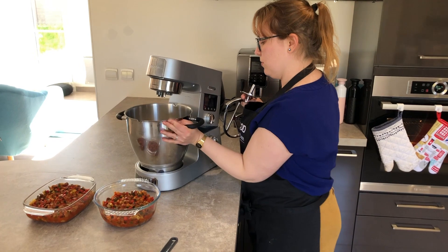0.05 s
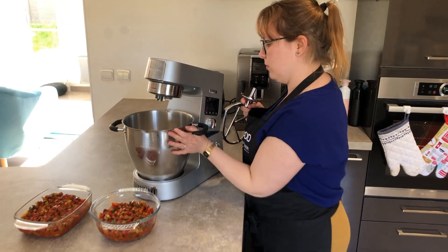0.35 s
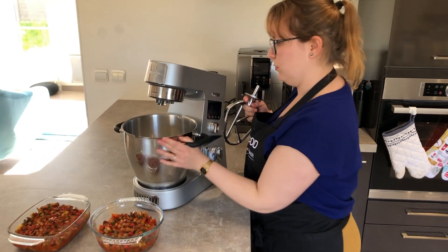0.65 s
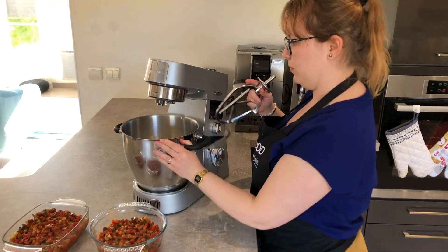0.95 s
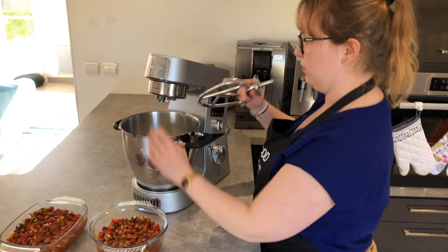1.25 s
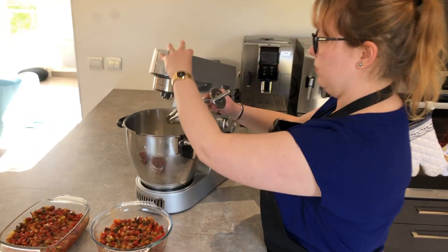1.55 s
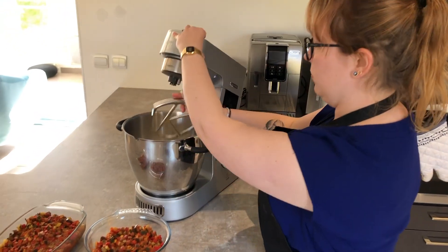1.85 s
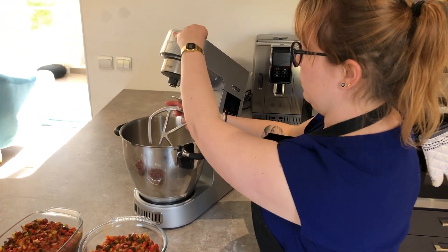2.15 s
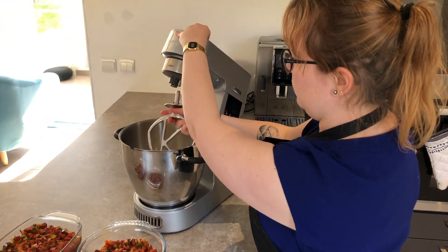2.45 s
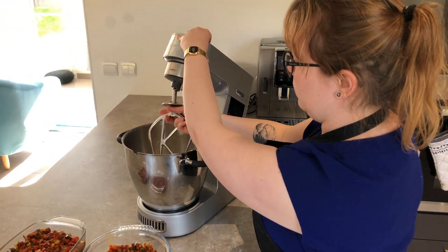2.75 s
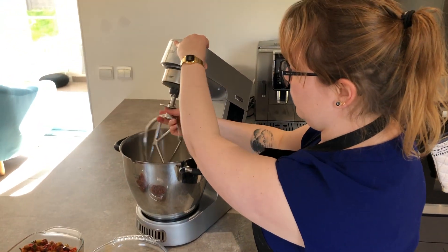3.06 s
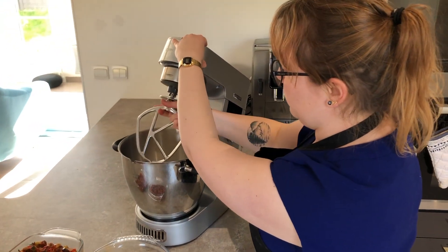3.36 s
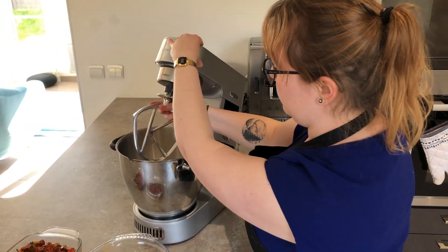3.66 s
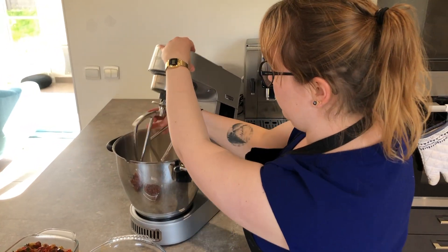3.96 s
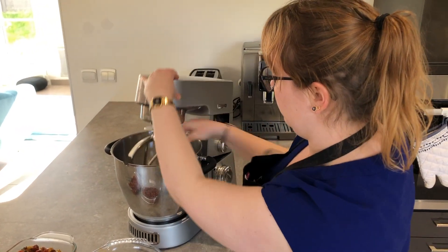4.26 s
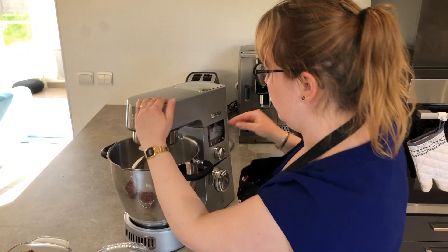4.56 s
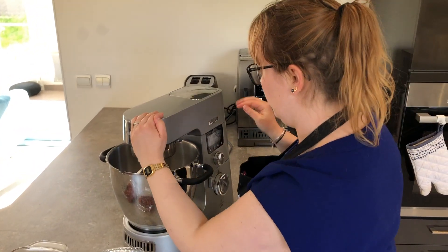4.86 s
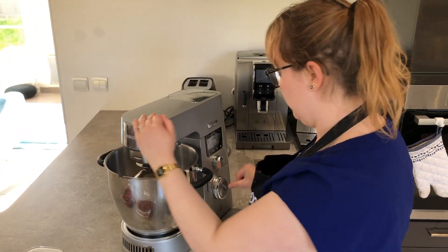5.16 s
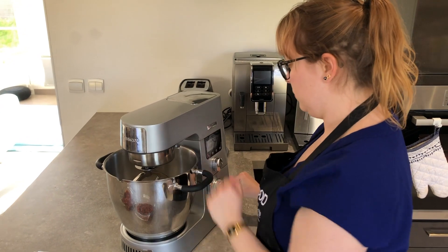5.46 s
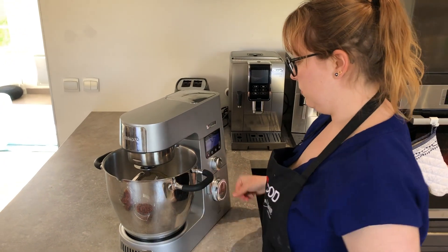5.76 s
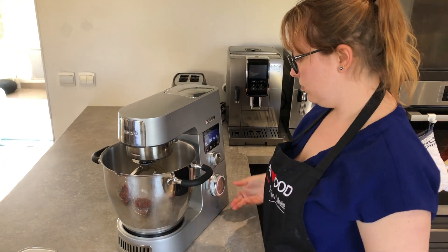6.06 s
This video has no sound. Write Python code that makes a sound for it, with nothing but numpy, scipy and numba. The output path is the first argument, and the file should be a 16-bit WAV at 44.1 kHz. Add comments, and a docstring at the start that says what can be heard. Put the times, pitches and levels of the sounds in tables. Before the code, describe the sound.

A steel bowl clunks, scrapes and squeaks into the base of a stand mixer, which thumps on the worktop. The head tilts up with a faint hollow rub, and a metal beater clicks and grazes into its socket, ringing brightly. The head swings down and locks with a sharp knock, followed by soft dial ticks. The motor stays off, and everything sounds nearby in a hard, echoing kitchen.

```python
"""A steel bowl clunks, scrapes and squeaks as it is twisted into the base of a stand mixer. The head
tilts up with a hollow rub, a beater clicks into its socket, and the head swings down and locks with
a sharp knock. The speed dial ticks softly, but the motor stays off. Each blow is a short clatter plus
ringing metal; the machine thumps on the worktop and a hard kitchen echoes it all."""
import sys
import numpy as np
from scipy import signal
from scipy.fft import rfft, irfft
from scipy.io import wavfile
from numba import njit

SR = 44100
rng = np.random.default_rng(int(sys.argv[2]) if len(sys.argv) > 2 else 0)


def output_pcm(signal):
    """Save a mono or channel-first signal as 16-bit PCM at the path in sys.argv[1].

    Samples are clipped to [-1, 1] before scaling.
    """
    pcm = np.clip(np.atleast_2d(signal).T, -1, 1) * 32767
    wavfile.write(sys.argv[1], SR, np.round(pcm).astype(np.int16))


N = 278271

# a blow or rub has four levels, one for each region from body to sizzle (frequency [Hz])
REGION_HZ = [350, 1400, 4500, 11000]
BANDS_HZ = 100 * 2 ** (np.arange(23) / 3)  # third octaves

# bowl lugs hitting the base (time [s], contact, place, level [dB], hardness [dB/octave])
BOWL_BLOWS = [(.023, "clunk", "foot", -36, 3.35), (.038, "clunk", "rim", -36, 1.1),
              (.073, "clunk", "rim", -43, 0.5), (.157, "clunk", "foot", -49.5, -0.5),
              (.318, "clunk", "rim", -48.5, -0.5), (.3585, "click", "foot", -32, 1.2),
              (.370, "clunk", "foot", -36, 0.4), (.381, "clunk", "rim", -41.5, 2.2),
              (.4605, "clack", "foot", -43.5, 0.54), (.6405, "clunk", "foot", -49, 0.2),
              (.670, "clunk", "foot", -49, -1.5), (.6855, "clunk", "rim", -44, -1.5),
              (.710, "clunk", "foot", -47, -0.5)]
# tone colour of their clatter (frequency [Hz], level [dB])
BOWL_COLOUR = [(100, -8.5), (160, -3), (250, -1.5), (400, -1.5), (630, -4.5), (900, -1.5), (1600, -2),
               (2500, -8.5), (3500, -2.5), (5000, -4.5), (7000, -2), (10000, -3.5), (15000, -9)]
# ring of the bowl and of the base under it (frequency [Hz], level [dB], t60 [s])
BOWL_MODES = [(280, -2.5, 0.11), (351, -10, 0.1), (380, 0, 0.77), (394, 3.5, 0.32), (434, -4.5, 0.58),
              (515, 2, 0.34), (563, -2, 0.65), (760, -11, 0.3), (2083, -25.5, 1), (3420, -16, 0.32),
              (3570, -28, 0.208), (3950, -53, 0.28), (5690, -34, .35)]
BASE_MODES = [(116, 2, 0.45), (164, 1.5, 0.4), (212.3, 1, 0.67), (254, 4, 0.36)]


def bowl():
    """The bowl's lugs knock against the base and set both ringing."""
    return strike(BOWL_BLOWS, BOWL_COLOUR)


# beater hitting the socket (time [s], contact, place, level [dB], hardness [dB/octave])
BEATER_BLOWS = [(2.642, "tick", "shank", -62, 4.5), (2.6705, "click", "beater", -32.5, -0.3),
                (2.761, "graze", "shank", -40.5, -0.4), (2.867, "graze", "socket", -43, -1.2),
                (2.876, "clunk", "socket", -46.5, 4), (2.923, "knock", "shank", -49.5, -3),
                (3.170, "tick", "shank", -51, -0.8), (3.190, "tick", "shank", -52.5, 0),
                (3.238, "knock", "shank", -60, 4), (3.2965, "clack", "head", -40, 0.7),
                (3.541, "tap", "shank", -59, 2), (3.567, "knock", "shank", -50.5, 0.7),
                (3.9315, "click", "shank", -37.5, 0.34)]
# tone colour of their clatter (frequency [Hz], level [dB])
BEATER_COLOUR = [(100, -6.5), (160, -10), (250, 1.5), (400, -1.5), (630, -10), (1000, -4), (1550, -6.5),
                 (2500, -10.5), (3400, -11), (4500, -12.5), (7000, -19), (10000, -17), (15000, -26)]
# bright ring of beater and socket, lower ring of the head (frequency [Hz], level [dB], t60 [s])
BEATER_MODES = [(1500, -8, .05), (1825, -12, .25), (2110, -11, .1), (2370, -15, .1), (2885, -8, .3),
                (3330, -5, .08), (3480, -4, .08), (4369, -6, .27), (4721, -17, .34), (4888, -3, .34),
                (4998, -14, .5), (5270, 0, .33), (5550, -12, .3), (5927, -18, .27), (6471, -27, .4),
                (8403, -29, .45), (9674, -31, .35), (10510, -27, .35), (10850, -16, .22)]
SOCKET_MODES = [(805, -10, .2), (990, -10, .2), (2084, -13, .2), (3357, -7, .25), (3540, -8, .2),
                (4341, -7, .25), (4921, -8, .15), (5141, -9, .2), (5206, -6, .2), (5357, -4, .24),
                (5549, -14, .25), (5640, -13, .2), (5931, -4, .26), (6030, -11, .2), (6191, -12, .35),
                (6912, -19, .34), (8409, -22, .4), (9426, -23, .3), (10290, -25, .45), (10850, -23, .2),
                (11160, -22, .17)]
HEAD_MODES = [(343, 0, .28), (463, 0, .38), (947, -12, .3), (1024, -9, .3), (1250, -12, .45),
              (1470, -6, .2), (1508, -2, .33), (1540, 15, .035), (1580, -5, .22), (1895, -16, .4),
              (2455, -20, .3), (3147, -16, .35), (3490, -13, .35), (3801, -15, .35), (4330, -16, .2),
              (4883, -25, .5), (5534, -26, .5), (6476, -22, .35), (6912, -23, .5), (9450, -28, .3),
              (10870, -23, .35)]


def beater():
    """The beater ticks and grazes its way into the socket; the hand damps blows on its shank."""
    return strike(BEATER_BLOWS, BEATER_COLOUR)


# hinge, lock and dial knocks (time [s], contact, place, level [dB], hardness [dB/octave])
FRAME_BLOWS = [(2.130, "tap", "damped frame", -65.5, -0.5), (2.199, "click", "damped frame", -61.5, 0.2),
               (4.126, "clunk", "damped frame", -57, 1), (4.726, "knock", "damped frame", -53, -1),
               (4.763, "click", "damped frame", -43, -5.5), (4.7697, "clack", "frame", -30.5, -0.6),
               (4.775, "clack", "frame", -40, -0.5), (4.7865, "clack", "damped frame", -31.5, -0.5),
               (4.797, "clunk", "frame", -33, -0.6), (5.238, "knock", "damped frame", -60, -4.5),
               (5.618, "knock", "damped frame", -66, -3.5)]
# tone colour of their clatter (frequency [Hz], level [dB])
FRAME_COLOUR = [(100, -46), (160, -13.5), (210, -7.5), (280, 2), (400, -4), (630, -8), (1000, -4),
                (1500, -5), (2000, -8.5), (3200, -3), (5000, -5.5), (7500, -0.5), (10000, -3), (15000, -10)]
# ring of the mixer's frame (frequency [Hz], level [dB], t60 [s])
FRAME_MODES = [(244, -2.5, 0.49), (260, -1, 0.07), (287, -21, 0.22), (319.6, 12, 0.094), (373.4, -3, 0.38),
               (399.7, 0, 0.5), (445, -2.5, 0.38), (586, -9, 0.38), (611, -5.5, 0.8), (669, -5.5, 0.58),
               (702, 0, 0.4), (762, -7, 0.21), (990, -4, 0.48), (1007, 2.5, 0.16), (1010, -11, 0.33),
               (1167, -8, 0.23), (1325, -10, 0.41), (1664, -17, 0.19), (2690, -40, .15)]


def frame():
    """Damped knocks barely ring the mixer's frame; the slam of the head locking rings it fully."""
    return strike(FRAME_BLOWS, FRAME_COLOUR)


# ways two parts meet, by contact (level in each region [dB], clatter t60 [s])
CONTACTS = {"clunk": ([1.5, -10, -3.5, -18], 0.098), "click": ([-15.5, -10, 0, -12.5], 0.029),
            "clack": ([-2.5, 0.5, -0.5, -9.5], 0.032), "tick": ([-2, -14, -2, 0], 0.037),
            "graze": ([-11, -4, 4, -24], 0.066), "tap": ([-20, 0.5, -11, -36], 0.016),
            "knock": ([-1, -2.5, -13, -44], 0.041)}
# what rings, by place struck (modes, level relative to the driving force [dB])
RINGS = {"rim": [(BOWL_MODES, -4.5), (BASE_MODES, -11.5)],
         "foot": [(BOWL_MODES, -15.5), (BASE_MODES, -6)],
         "beater": [(BEATER_MODES, 0), (HEAD_MODES, -16.5)],
         "socket": [(SOCKET_MODES, -2)],
         "head": [(HEAD_MODES, -3.5)],
         "shank": [(HEAD_MODES, -23)],
         "frame": [(FRAME_MODES, -4)],
         "damped frame": [(FRAME_MODES, -15)]}
# where in its spectrum a blow drives the ring, by place struck (frequency [Hz])
DRIVE_HZ = {"rim": 350, "foot": 350, "beater": 4500, "socket": 4500,
            "head": 1400, "shank": 1400, "frame": 1400, "damped frame": 1400}


def strike(blows, colour):
    """Blows on one assembly: returns their clatter and the ring of its parts, which follows the force."""
    knocks, rings = np.zeros(N), np.zeros(N)
    for s, kind, place, db, hardness in blows:
        shape_db, t60 = CONTACTS[kind]
        region_db = tilt(shape_db, db, hardness)
        add(knocks, s, clatter(band_gains(region_db, colour), t60))
        force_db = at(list(zip(REGION_HZ, region_db)), DRIVE_HZ[place])
        for modes, ring_db in RINGS[place]:
            add(rings, s, undb(force_db + ring_db) * ring(modes))
    return knocks, rings


def clatter(gains, t60, low_linger=0.22):
    """Crowded, heavily damped modes; t60 holds at 3 kHz and lower bands last longer."""
    t = clock(.25)
    bands = [burst(t, hz, t60 * (3000 / hz) ** low_linger) for hz in BANDS_HZ]
    return gains @ np.array(bands)


def ring(modes):
    """A part's clear modes start together; each blow shares its energy among them a little differently."""
    t = clock(.9)
    out = 0
    for hz, db, t60 in modes:
        out = out + undb(db + rng.standard_normal()) * fade(t, t60) * np.sin(2 * np.pi * hz * t)
    attack = 1 - fade(t, 0.0033)
    return out * attack


# shoves on the machine (time [s], pitch [Hz], level [dB], whether it rocks back)
THUMPS = [(0.044, 86.3, -29.5, True), (.386, 82.8, -26, True), (0.707, 91.2, -42, False),
          (2.95, 80.5, -55, False), (3.136, 99, -48, False), (3.332, 88.5, -50.5, False),
          (4.792, 67.7, -34, False), (5.259, 64.3, -53, False)]


def worktop(swell_s=0.024, tail_db=-12, sway_hz=53.3):
    """The heavy machine sways and rocks on its feet: low thumps that build over a few cycles and linger."""
    out, t = np.zeros(N), clock(.8)
    push = (t / swell_s * np.exp(1 - t / swell_s)) ** 2
    linger = undb(tail_db) * (1 - np.exp(-t / swell_s)) * fade(t, .65)
    thump = lambda hz, db: undb(db) * (push + linger) * np.sin(2 * np.pi * hz * t)
    for s, hz, db, rocks_back in THUMPS:
        add(out, s - .017, thump(sway_hz, db - 10))  # the whole machine sways first
        add(out, s, thump(hz, db))
        if rocks_back:
            add(out, s + .125, thump(hz, db - 12.5))
    return out


# squeaks of the bowl's rim (time [s], pitch [Hz], level [dB])
SQUEAKS = [(.1565, 4550, -41.5), (.380, 5060, -40), (.685, 3890, -43.5)]


def squeaks():
    """The rim binds and chatters briefly in one narrow resonance."""
    out = np.zeros(N)
    for s, hz, db in SQUEAKS:
        add(out, s, undb(db) * burst(clock(.2), hz, t60=0.027))
    return out


# swings of the head (peak time [s], rise [s], fall [s], pitch at peak [Hz], sink [octaves/s], level [dB])
SWINGS = [(1.88, .26, 0.16, 975, 0.95, -60), (4.14, .04, 0.19, 1040, 3.9, -58),
          (4.41, .18, .14, 564, 4.2, -54)]
# broad friction in each region (level relative to the hollow resonance [dB])
HINGE_FRICTION_DB = [-1.5, -13, -20, -28]


def hinge(swell_db=20, q=2.5):
    """Friction in the hinge follows the head's speed and sounds through one sinking cavity resonance."""
    out = np.zeros(N)
    for s, rise, fall, peak_hz, sink, db in SWINGS:
        t = clock(rise + fall) - rise
        speed = undb(db - swell_db * np.maximum(-t / rise, t / fall))
        hz = peak_hz * 2 ** (-sink * t)
        noise = rng.standard_normal(len(t))
        cavity = resonate(resonate(noise, hz, q), hz, q) / np.sqrt(hz)
        hollow = speed * unit(cavity) * np.sqrt(len(t))
        add(out, s - rise, hollow + friction(speed, HINGE_FRICTION_DB, grain_db=3.0))
    return out


# steel, hands and sleeves sliding (start [s], length [s], slide, level [dB], hardness [dB/octave])
RUBS = [(-.03, .052, "scrape", -47, 0.2), (0.323, .051, "scrape", -45.5, -1),
        (1.10, .11, "brush", -78.5, 1.7), (1.193, 0.037, "scrape", -70.5, 3),
        (1.571, 0.17, "brush", -74.5, 1.3), (2.183, 0.15, "brush", -74.5, 3.2),
        (2.986, 0.33, "brush", -65, -5), (4.107, 0.16, "brush", -71.5, 0.4),
        (4.219, 0.41, "brush", -77.5, -2.2), (4.565, 0.38, "scrape", -74, -0.8),
        (5.421, 0.41, "brush", -81.5, 1.5), (5.951, .11, "scrape", -81, 2.6)]
# scrape and brush (level in each region [dB])
SLIDES = {"scrape": [1, -8, -3, -9.5], "brush": [-2.5, 0.5, -6, -12]}


def rubbing():
    """Steel and hands slide: each rub swells and dies away."""
    out = np.zeros(N)
    for s, length, kind, db, hardness in RUBS:
        swell = signal.windows.tukey(len(clock(length)), .8)
        add(out, s, friction(swell, tilt(SLIDES[kind], db, hardness), grain_db=2.0))
    return out


# tone colour of sliding surfaces (frequency [Hz], level [dB])
RUB_COLOUR = [(100, -14), (160, -13.5), (300, -2), (550, -3.5), (1000, -1), (1600, -4.5), (3000, 0.5),
              (5000, 1.5), (8000, -3.5), (15000, -8)]


def friction(envelope, region_db, grain_db):
    """Dense tiny slips of uneven size under an envelope."""
    n = len(envelope)
    slips = undb(grain_db * rng.exponential(size=n))
    bands = [unit(band(slips * rng.standard_normal(n), hz)) for hz in BANDS_HZ]
    return band_gains(region_db, RUB_COLOUR) @ np.array(bands) * np.sqrt(n) * envelope


# ticks of the speed dial (time [s], level [dB])
DETENTS = [(5.446, -68), (5.467, -56.5), (5.616, -59), (5.640, -71)]


def dial():
    """The speed dial turns through soft detents, each a tiny rattle in the same resonance."""
    out = np.zeros(N)
    for s, db in DETENTS:
        add(out, s, undb(db) * burst(clock(.2), hz=950, t60=0.025))
    return out


# reverb decay of the kitchen (frequency [Hz], t60 [s])
KITCHEN_T60 = [(80, 0.48), (300, 0.57), (1000, 0.73), (3500, 0.67), (6000, 0.58), (9000, 0.33),
               (15000, 0.22)]


def kitchen(x, build_s=0.0029):
    """Echoes off worktop, walls and cupboards thicken quickly; the treble dies first."""
    t = clock(.9)
    build = 1 - np.exp(-t / build_s)
    response = 0
    for hz in BANDS_HZ:
        tail = rng.standard_normal(len(t)) * fade(t, at(KITCHEN_T60, hz)) * build
        response = response + unit(band(tail, hz)) * np.sqrt(hz)
    return signal.fftconvolve(x, unit(response))[:N]


# room tone spectrum (frequency [Hz], relative level [dB])
ROOM_TONE = [(26, -48), (45, -16), (103, -5), (155, -13.5), (229, -2.5), (265, -10), (300, -2.5),
             (364, -12.5), (391, -11), (578, -17), (637, -15.5), (685, -18.5), (1110, -23), (1320, -24.5),
             (15000, -45)]


def room_tone(level_db=-62):
    """The soft steady rush of the room."""
    colour = undb(at(ROOM_TONE, np.fft.rfftfreq(N, 1 / SR)))
    noise = irfft(rfft(rng.standard_normal(N)) * colour, N)
    return undb(level_db) * unit(noise) * np.sqrt(N)


def tilt(shape_db, db, hardness, pivot_hz=1400):
    """Level in each region: a harder contact tips the balance towards the treble."""
    return db + np.array(shape_db) + hardness * np.log2(np.array(REGION_HZ) / pivot_hz)


def band_gains(region_db, colour):
    """Gain of every band for one contact on one part."""
    return undb(np.interp(np.log(BANDS_HZ), np.log(REGION_HZ), region_db) + at(colour, BANDS_HZ))


def burst(t, hz, t60):
    """A dying third octave of noise, with the energy of 10 ms at 0 dB."""
    noise = rng.standard_normal(len(t)) * fade(t, t60)
    return unit(band(noise, hz)) * np.sqrt(SR / 100)


def band(x, hz):
    """Third-octave band-pass."""
    edges = hz * 2 ** (np.array([-1, 1]) / 6)
    return signal.lfilter(*signal.butter(2, edges, "bandpass", fs=SR), x)


@njit
def resonate(x, hz, q):
    """State-variable band-pass whose centre moves."""
    y, band_state, low_state = np.empty(len(x)), 0., 0.
    for i in range(len(x)):
        g = np.tan(np.pi * hz[i] / SR)
        passed = (band_state + g * (x[i] - low_state)) / (1 + g * (g + 1 / q))
        band_state = 2 * passed - band_state
        low_state += 2 * g * passed
        y[i] = passed / q
    return y


def undb(db):
    """Decibels to gain."""
    return 10 ** (np.asarray(db) / 20)


def at(points, hz):
    """Read (Hz, value) points on a log-frequency axis."""
    f, value = np.transpose(points)
    return np.interp(np.log(hz + 1e-9), np.log(f), value)


def clock(seconds):
    """Sample times of a stretch of sound."""
    return np.arange(int(seconds * SR)) / SR


def fade(t, t60):
    """Exponential decay, 60 dB down after t60."""
    return np.exp(-np.log(1000) * t / t60)


def unit(x):
    """Scale to an energy of one."""
    return x / np.sqrt(np.sum(x ** 2) + 1e-18)


def add(track, s, sound):
    """Mix a sound into the track at time s."""
    start = int(s * SR)
    sound = sound[max(-start, 0):N - start]
    track[max(start, 0):max(start, 0) + len(sound)] += sound


def scene():
    """Bowl, beater and mixer head, heard directly and through the kitchen, over room tone."""
    bowl_clatter, bowl_ring = bowl()
    beater_clatter, beater_ring = beater()
    frame_clatter, frame_ring = frame()
    # (layer, reverb send [dB])
    layers = [(bowl_clatter, -4), (beater_clatter, -3), (frame_clatter, -5.5),
              (bowl_ring + beater_ring + frame_ring, -13), (worktop(), 0),
              (squeaks() + dial(), -10), (rubbing() + hinge(), -4)]
    direct = sum(layer for layer, _ in layers)
    send = sum(undb(db) * layer for layer, db in layers)
    return (direct + kitchen(send) + room_tone())[None]


def record(dry):
    """The microphone drops the deepest rumble and the top is cut steeply."""
    dry = signal.sosfilt(signal.butter(2, 35, "highpass", fs=SR, output="sos"), dry)
    return signal.sosfilt(signal.ellip(10, .1, 70, 15900, fs=SR, output="sos"), dry)


dry = scene()
out = record(dry)
output_pcm(out)
```